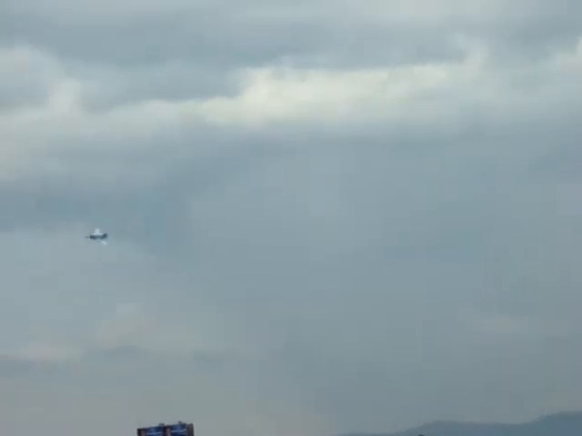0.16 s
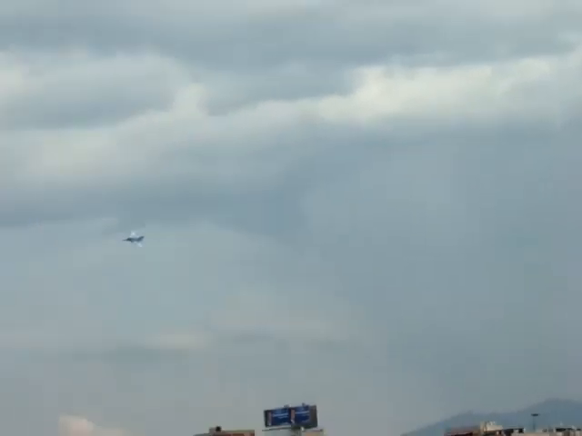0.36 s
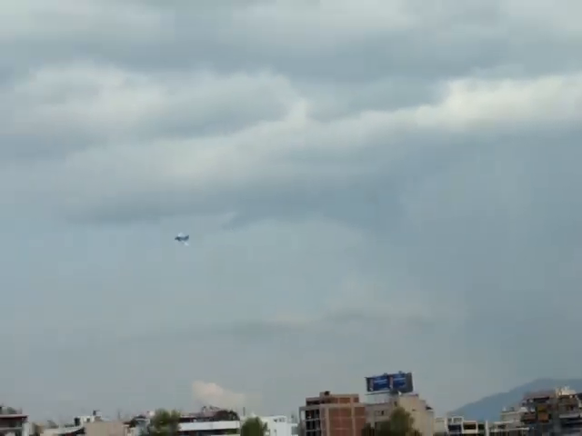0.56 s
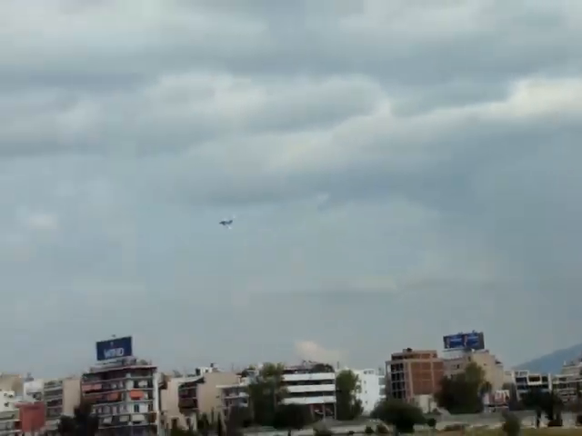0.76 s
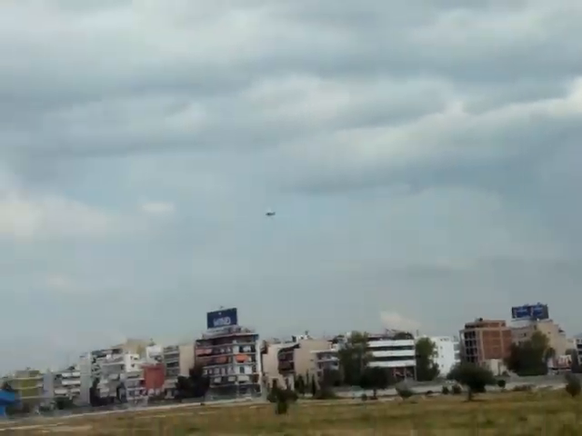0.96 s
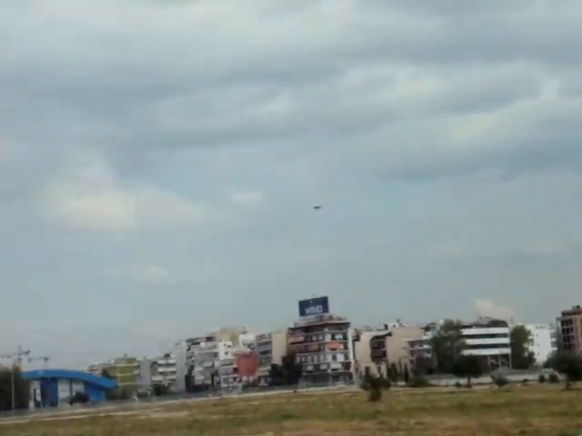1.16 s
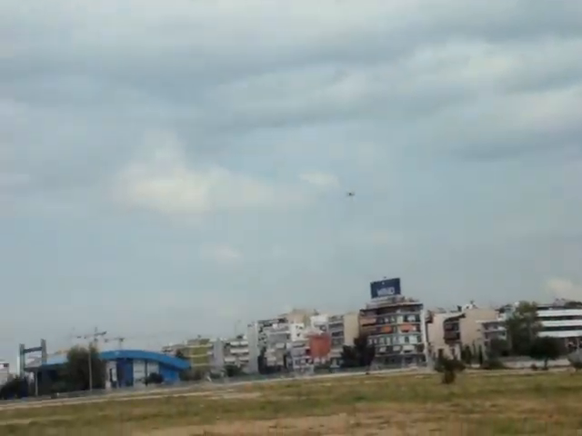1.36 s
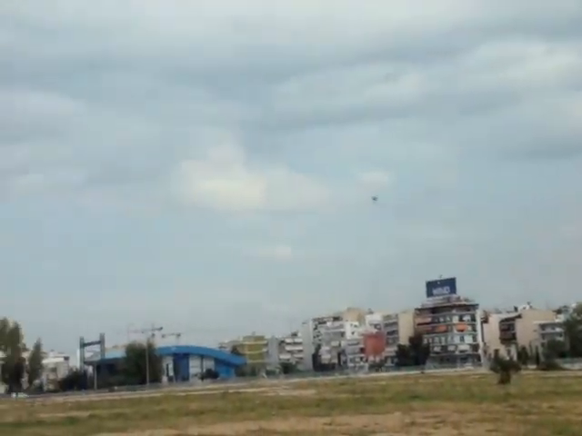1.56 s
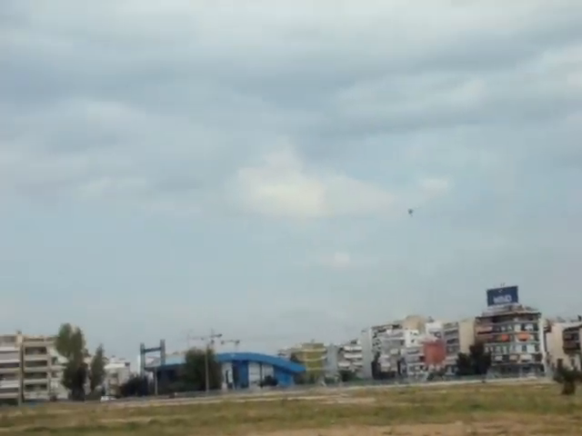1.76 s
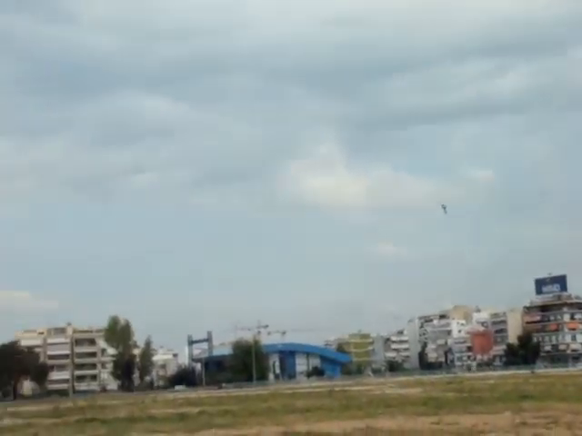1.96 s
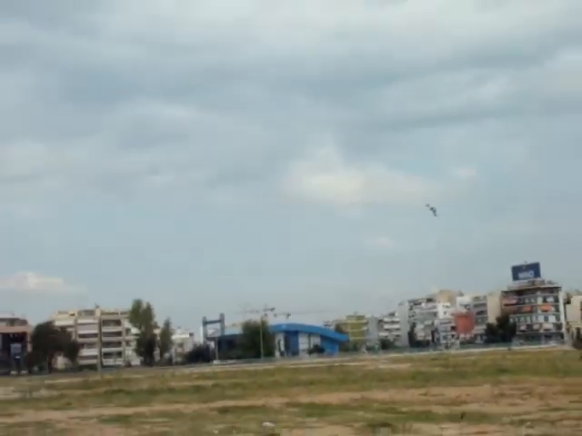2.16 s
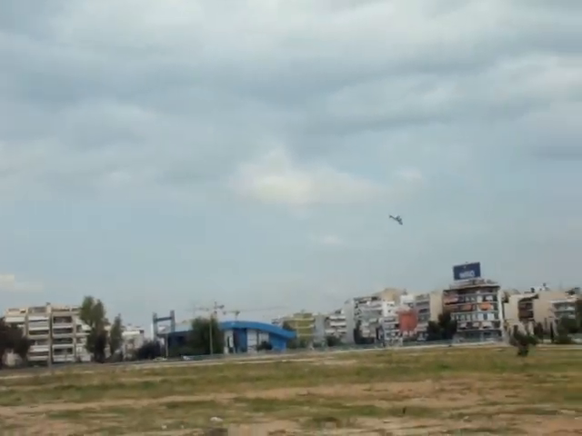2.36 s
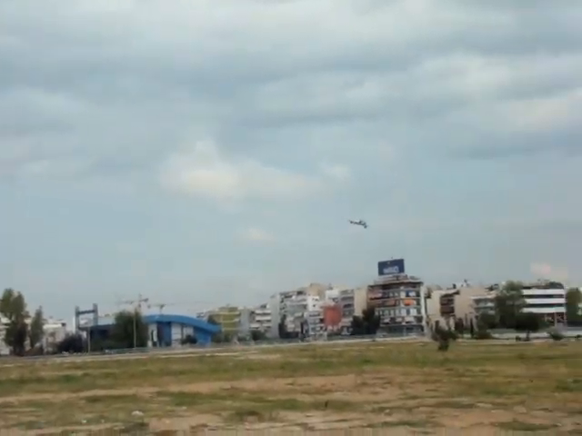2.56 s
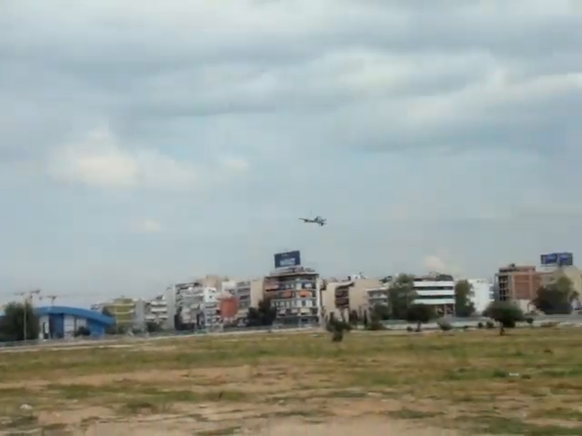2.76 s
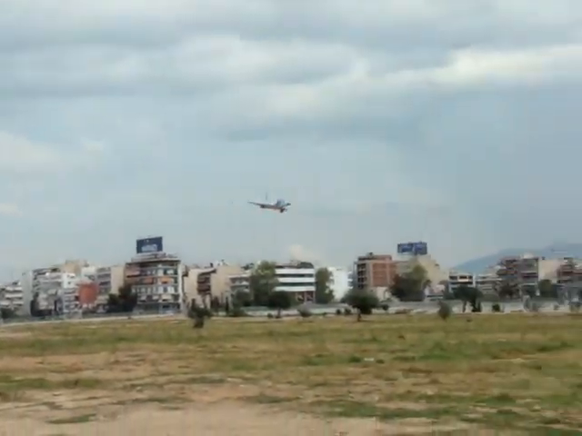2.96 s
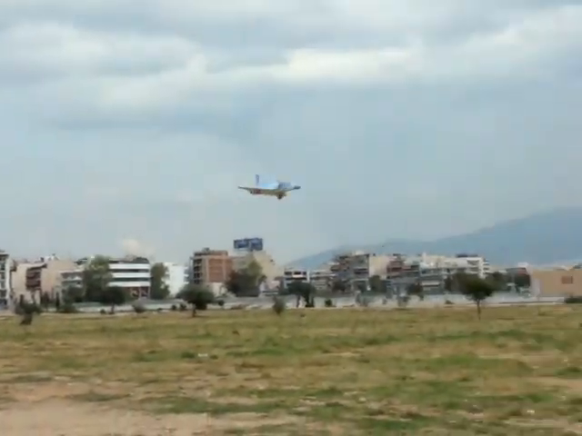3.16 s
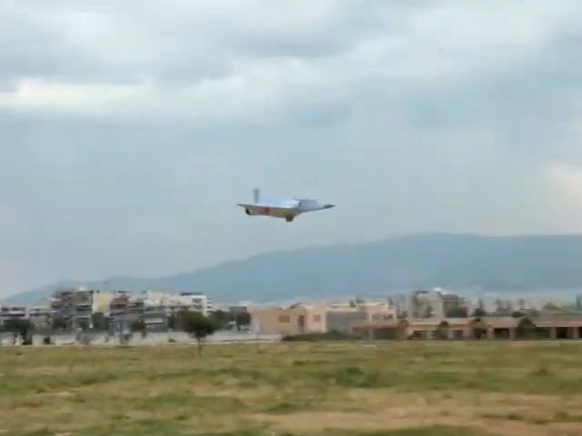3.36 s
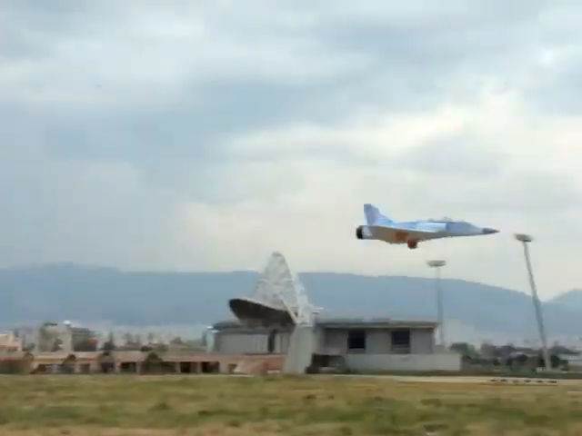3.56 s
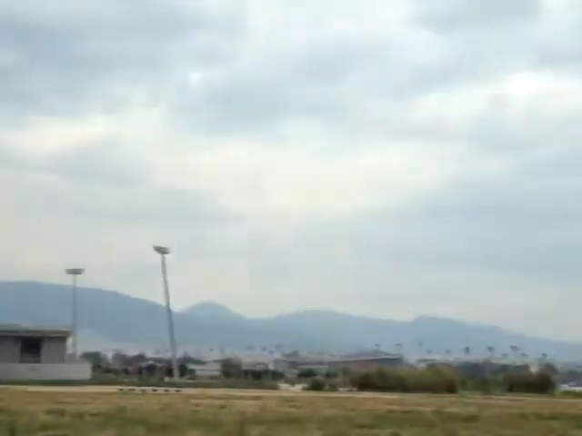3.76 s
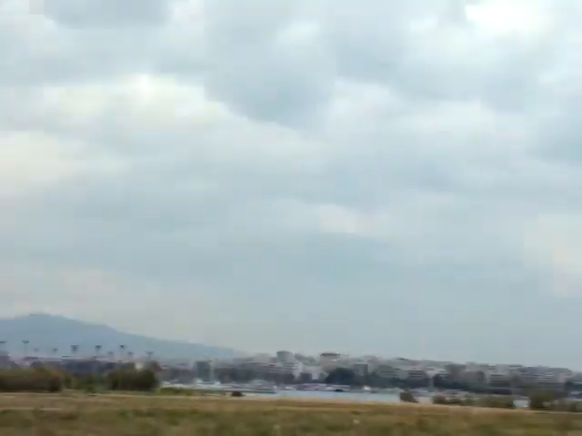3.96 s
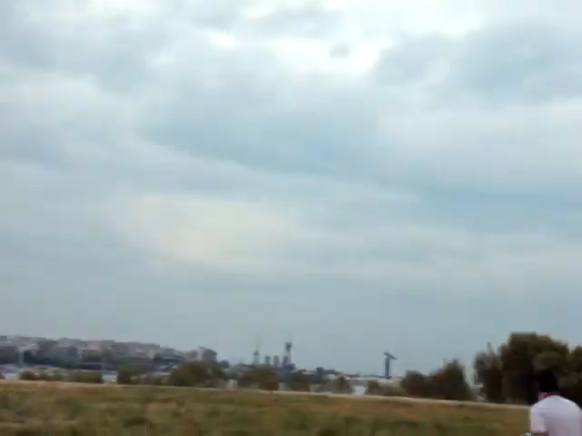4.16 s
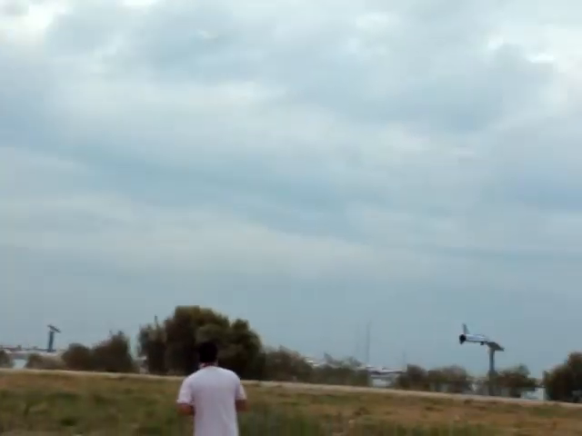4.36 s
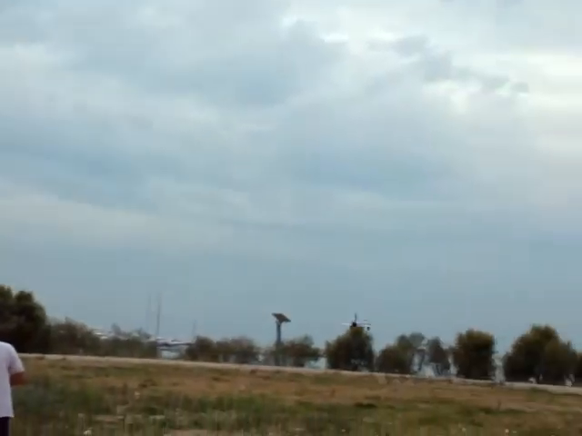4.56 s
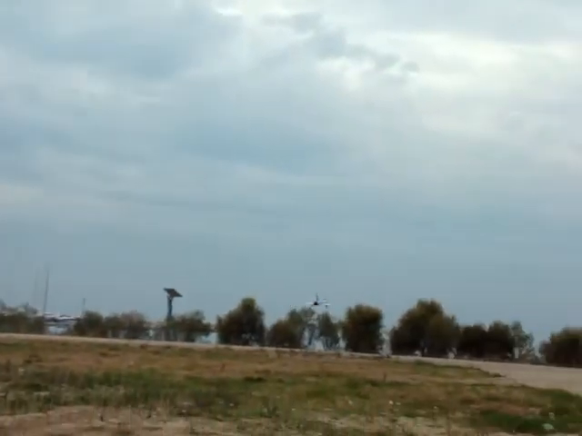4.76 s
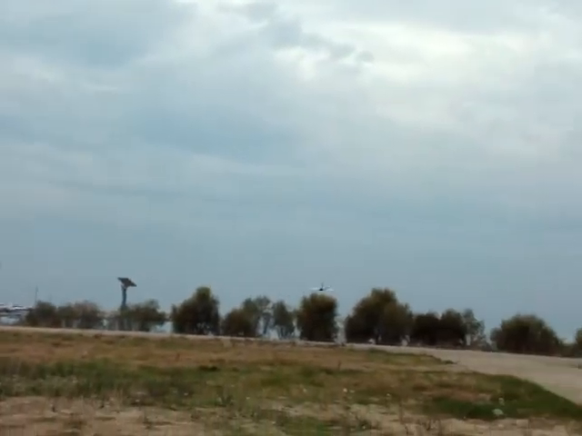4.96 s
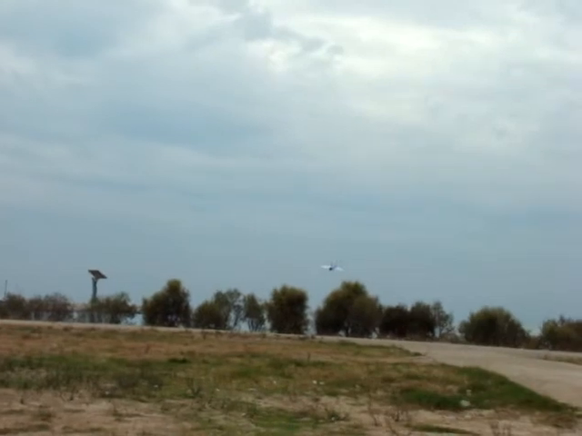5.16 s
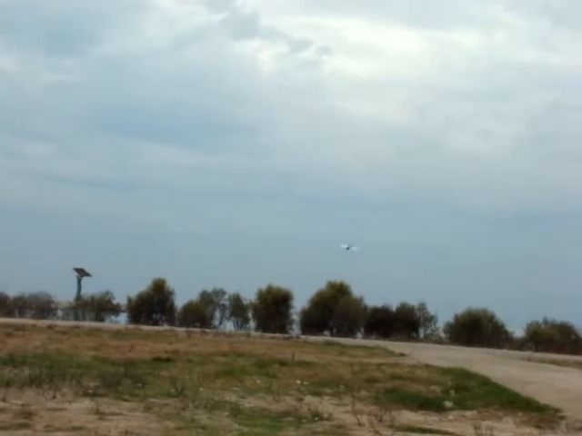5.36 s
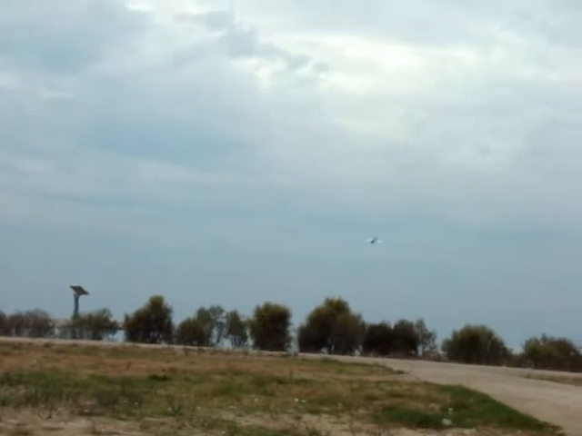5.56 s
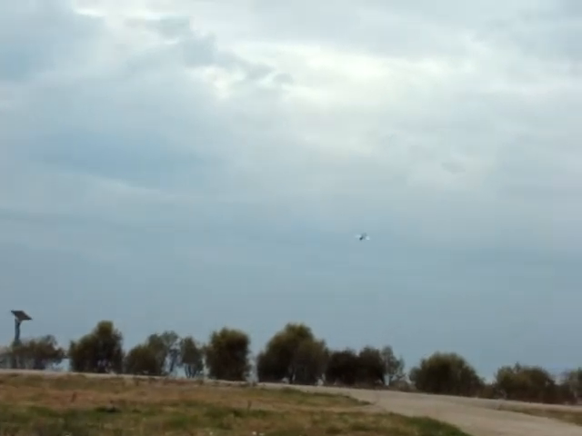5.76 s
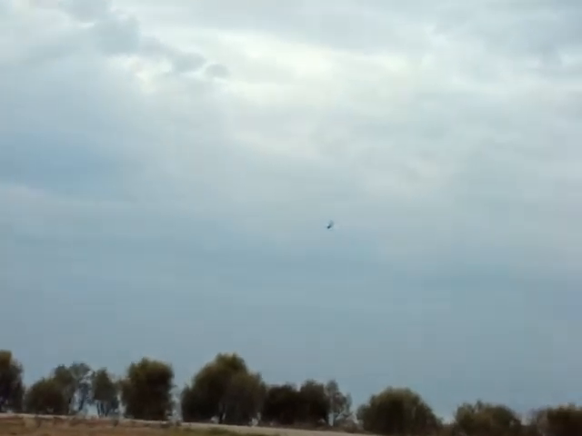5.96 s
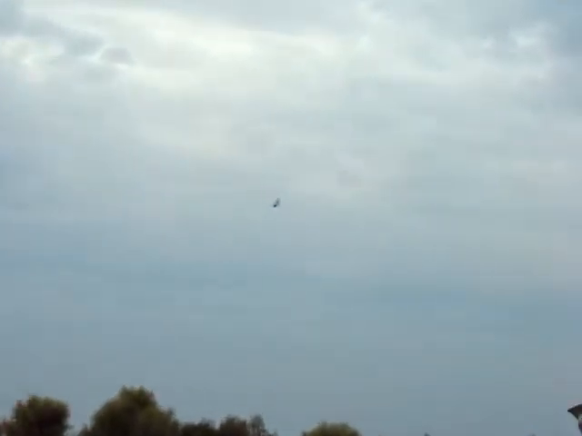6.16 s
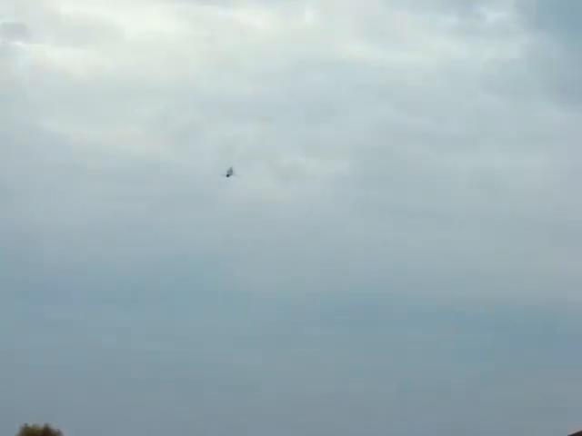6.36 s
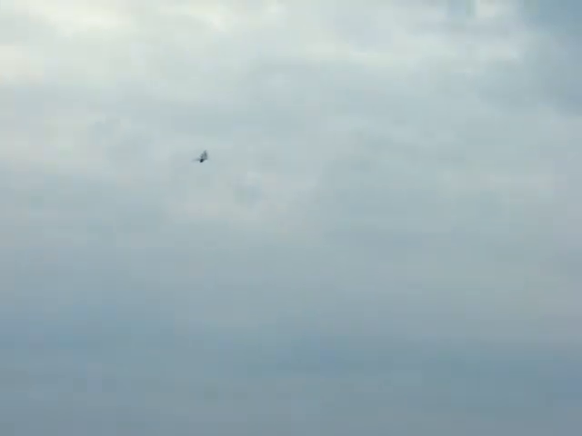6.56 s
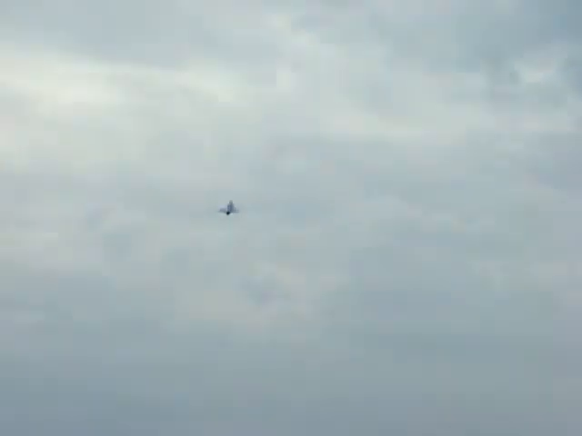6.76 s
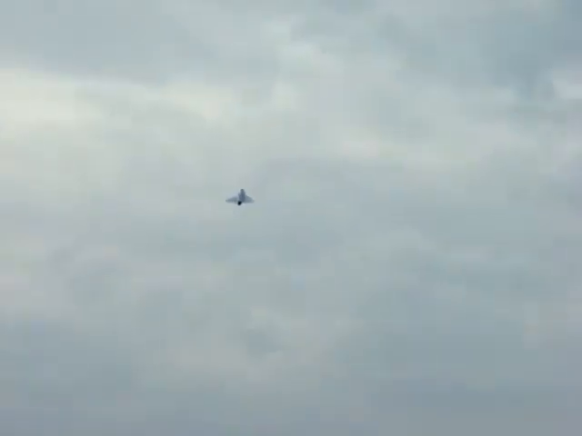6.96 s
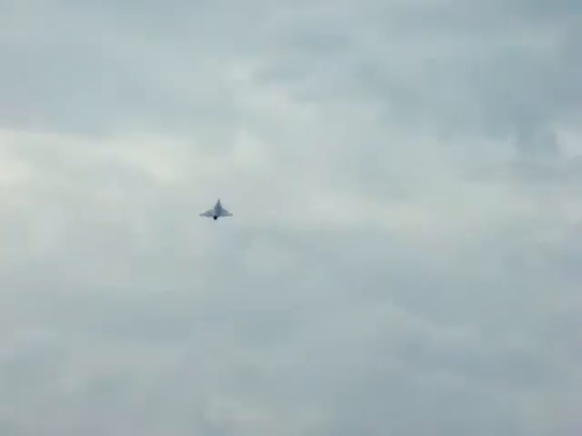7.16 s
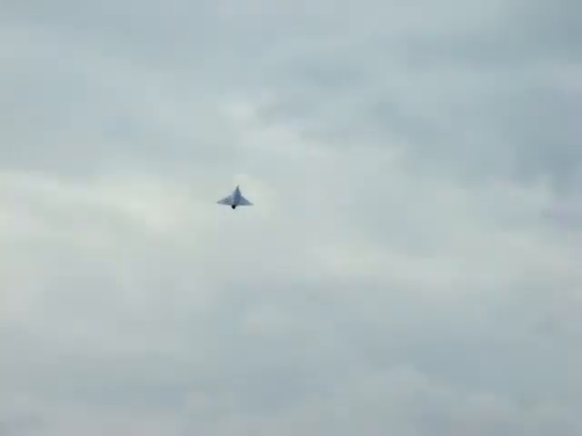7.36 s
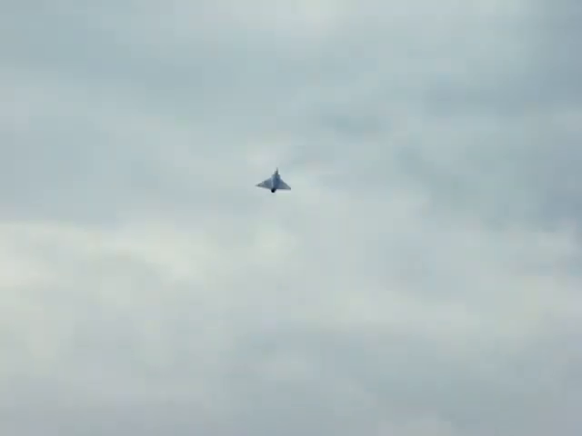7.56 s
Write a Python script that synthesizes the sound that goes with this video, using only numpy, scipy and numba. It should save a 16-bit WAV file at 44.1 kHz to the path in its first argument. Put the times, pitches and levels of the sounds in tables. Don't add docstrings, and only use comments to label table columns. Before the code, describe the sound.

Over a faint town hum, a small electric jet's singing whine and airy roar swell, slide downward in a close pass, and recede.

```python
import sys
import numpy as np
from scipy import signal
from scipy.fft import rfft, irfft, next_fast_len
from scipy.io import wavfile
from scipy.ndimage import uniform_filter1d, map_coordinates
from numba import njit

SR = 44100
rng = np.random.default_rng(int(sys.argv[2]) if len(sys.argv) > 2 else 0)


def persist_wave(psi):
    counts = np.round(np.clip(psi, -1, 1) * 32767).astype(np.int16)
    wavfile.write(sys.argv[1], SR, np.atleast_2d(counts).T)


def undo_db(level):
    steps = np.asarray(level, float) / 20
    return 10 ** steps


N = 335601
TIME = np.arange(N) / SR
NEAR_DB = -40
TOP_HZ = 10120

# pitch_hz, level_db (per Hz)
TOWN_COLOUR = [(15, -56), (25, -21.5), (121, -4.5), (271, -2), (322, -5), (494, -3), (603, -5), (857, -3),
               (1350, -8), (2930, -10), (5760, -21), (6700, -27.5), (10000, -46), (13000, -50.5),
               (22000, -120)]
# start_s, end_s, pitch_hz, level_db, second_partial_db
LORRY = (0, .32, 155, -50, -46)
# start_s, length_s, pitch_hz, relative_width (ratio), level_db
SWELLS = [
    (2.8, 0.53, 91, 0.96, -43.5),
    (3.493, 0.55, 360, 0.19, -44),
    (3.62, .42, 880, .2, -40.5),
    (0.45, 0.84, 400, 0.071, -51),
    (5.6, 1.96, 405, .08, -51),
    (1.25, 1.05, 4490, 0.11, -43),
    (1.4, 1.5, 6900, .15, -45),
]
# time_s, low_hz, high_hz, level_db
SIDE_HISS = [(.36, 6800, 8200, -62), (1.58, 6860, 8300, -44), (1.58, 4200, 5240, -37),
             (2.53, 7600, 9000, -42), (4.04, 6900, 8313, -35), (6.2, 7600, 9060, -40),
             (7.29, 6890, 8300, -49), (7.29, 5200, 6300, -46)]
# time_s, knock_db, snap_db
TICKS = [
    (.026, -16.5, -23),
    (.1935, -34, -25.5),
    (7.4527, -18, -34),
]
# pitch_hz, level_db, fade_by_60_db_s
CASE_RINGS = [(1025, 1, 0.031), (1580, 0.5, 0.024), (445, -7.5, 0.073), (3570, -5, 0.02)]
# start_s, length_s, level_db, bass_dip_db
SCUFFS = [(6.861, .02, -23, -8.5), (6.896, 0.089, -35, 0), (7.024, 0.045, -32, -0.5),
          (7.114, 0.03, -28.5, 2), (7.162, 0.046, -30, -0.5), (7.219, 0.027, -31, 0.5),
          (7.324, 0.021, -24.5, 0.5)]
# pitch_hz, level_db (per Hz)
CLOTH_COLOUR = [(2800, -19), (3600, -11), (5200, -8.5), (7500, -5), (9500, 3.5), (11000, -7)]
# start_s, length_s, low_hz, high_hz
TREBLE_LOSSES = [(0.027, 0.02, 5440, 8800), (0.198, 0.041, 4970, 7800), (6.995, .015, 9702, 11000),
                 (7.12, .012, 8900, 11000), (7.272, .014, 9700, 11000), (7.337, 0.023, 9100, 11000),
                 (7.337, 0.011, 6700, 7900)]

# pitch_hz, level_db (per Hz)
ROAR_COLOUR = [(450, -13), (700, 2), (1200, 0.5), (1800, -0.5), (3400, -14)]
# time_s, nearness_db, bank_db (plus is nozzle towards the camera)
FLIGHT = [(0, -63, -8), (.4, -57, 0.5), (.8, -50, -1), (1.2, -46.5, -2), (1.4, -43, -1), (1.9, -41.5, -5),
          (2.35, -42, 2), (3.0, -33, -1), (3.2, -37, .5), (3.4, -31, 2), (3.62, -39, 0), (4.0, -33.5, 0.5),
          (4.6, -33, 0.2), (5.6, -40, 1), (6.0, -41, 1.5), (6.4, -45.5, 1.1), (7.0, -43.5, -1),
          (7.61, -48.5, 2.5)]
# time_s, shaft_hz
SHAFT = [(0.0, 526.6), (0.6, 537.5), (1.09, 546.4), (1.52, 551.3), (2.17, 554.3), (2.75, 557.5),
         (3.05, 556.7), (3.33, 550.6), (3.52, 543.3), (3.72, 523.9), (3.94, 497), (4.09, 486.6),
         (4.24, 480), (4.6, 473.6), (5.0, 471.4), (6.17, 471.5), (6.89, 475.9), (7.6, 476.5)]
# time_s, delay_ms, share (0-1)
GROUND = [(0, 1.85, .3), (.5, 1.55, .35), (1.1, 1.36, .4), (2.8, 1.33, .3), (3.4, 2.2, .05),
          (4.1, 2.1, .15), (4.5, 1.1, .35), (4.8, .72, .4), (5.3, .68, .35), (5.7, .95, .2),
          (7.61, 2.65, .3)]
# shaft_multiple, width_multiples, level_db, extra_astern_db
DUCT = [
    [(5.12, .55, -3.5, 2), (5.3, 2.2, -4, 2)],
    [(6.8, 1.3, -3.5, -1.5), (8.1, 1.2, -1.5, 1), (9.6, 1.6, -5, 5)],
    [(11.3, 1.5, -3.5, -5), (13, 2.3, 2, 0.5), (15.2, 2.1, -5, 3.5)],
    [(16.72, 2.1, -4, 1.5), (17.72, 1.9, -0.5, 2), (19.68, 2.4, -2.5, 1)],
]
# level_db, nearness_slope (dB/dB), bank_slope (dB/dB), astern_db
PARTS = [
    (8, 0.86, -0.092, -7),
    (-0.05, 0.96, -0.85, -.3),
    (0.2, 0.86, -0.037, 0.1),
    (-0.84, 0.99, .9, 0.7),
]
# time_s, half_width_s, level_db
WAKE_BEAMS = [(.5, 0.46, -44.5), (2.1, 0.39, -38.5), (3.2, 0.22, -25.5), (3.8, 0.21, -31), (5.0, .15, -43)]
# time_s, half_width_s, change_db
SHADES = [
    [(1.9, 0.33, -1.5), (2.38, 0.28, -2), (2.93, .18, 3.5), (3.9, .2, 0.5), (6.5, 0.33, -3), (7.0, .15, -1)],
    [(1.3, .2, 0), (2.35, 0.16, 0.5), (.65, 0.44, -3.5), (3.25, 0.16, 3.5), (4.3, 0.42, -2),
     (5.2, .2, -1.5), (6.0, 0.95, 1.5)],
    [(1.5, .15, -4.5), (2.3, 0.41, 3.5), (3.0, .2, -1), (4.2, 0.18, 0.5), (6.4, .15, -2), (7.5, .2, -4)],
]

# time_s, half_width_s, level_db
SHAFT_BEAMS = [(.45, 0.61, -29.5), (1.5, .9, -30), (2.05, 0.21, -48), (2.8, 0.44, -30), (3.1, 0.35, -25),
               (3.33, 0.12, -16.5), (3.55, 0.45, -17.5), (3.6, 0.035, -19), (4.0, .2, -26),
               (4.15, 0.23, -34.5), (4.38, .05, -42), (4.67, .14, -48), (6.8, 2.6, -44.5)]
TWICE_BEAMS = [(1.27, 0.52, -43.5), (1.73, 1.4, -47.5), (3.3, 0.65, -32.5), (3.36, 0.24, -24.0),
               (3.46, 0.11, -25.0), (3.73, 0.063, -35), (4.52, 0.79, -38), (4.58, 0.17, -35.0),
               (5.57, 0.58, -47.0), (7.17, 1.36, -49.5)]
BLADE_BEAMS = [(0.03, 0.06, -38.5), (0.38, 0.27, -30.5), (1.08, 0.19, -21.5), (1.15, 0.51, -26.5),
               (1.3, 0.16, -25), (1.39, 1.34, -33), (1.82, 0.32, -26.5), (1.83, 0.04, -28.0),
               (2.32, 0.12, -28.5), (2.63, 0.3, -21), (3.02, 0.07, -38.5), (3.14, 0.14, -18.5),
               (3.3, 0.06, -23.0), (3.44, 0.09, -19), (3.55, 0.032, -15), (3.66, 0.08, -16),
               (3.79, 0.44, -22.5), (3.8, 0.027, -18), (4.17, 0.04, -30.5), (4.41, 0.17, -24),
               (4.72, 0.15, -24.5), (4.96, 1.11, -28.0), (5.94, 0.15, -32.5), (6.39, 0.05, -36.0),
               (6.56, 2.22, -37), (7.17, 0.34, -41)]
WEAK_BEAMS = {3: [(.93, 0.86, -49), (2.49, 0.43, -45), (3.24, .13, -37.5), (3.49, 0.047, -32),
              (3.5, 0.63, -43), (3.76, 0.071, -31.5), (4.05, 0.092, -41), (4.82, 0.63, -45.5)],
              4: [(.88, 1.5, -49), (1.7, .5, -46), (2.69, 0.13, -38.5), (3.2, 0.92, -41),
              (3.82, 0.084, -38), (3.5, 0.048, -30), (3.68, 0.066, -30), (3.97, .05, -38),
              (5.62, 1.52, -48.5), (7.0, 0.41, -43.5), (7.7, 0.25, -43)], 6: [(.4, .3, -53),
              (3.48, .09, -32.5), (3.63, 0.063, -38.5), (3.8, .1, -40), (3.6, 0.72, -46.5),
              (6.5, 2.7, -54)], 7: [(1.9, .6, -49), (2.87, 0.66, -43.5), (3.06, .08, -39),
              (3.6, 0.065, -38), (4.1, .8, -52)]}
WHINE_BEAMS = {10: [(.4, .15, -56), (.78, 0.4, -50), (1.2, 0.41, -52.5), (1.6, .3, -53), (2.0, .1, -45),
               (3.15, 0.1, -36.5), (3.0, .25, -49), (3.47, .06, -43), (3.33, 0.078, -33.5),
               (3.85, .04, -40), (3.97, 0.037, -32.5), (4.13, 0.039, -32), (4.22, .25, -43),
               (4.7, 0.49, -46), (5.52, .1, -45), (5.9, 2.8, -50.5)], 15: [(.87, 0.13, -57),
               (1.52, 0.25, -47), (2.44, .1, -41), (3.28, 0.14, -34.5), (4.12, .06, -36.5), (4.3, .07, -35),
               (4.5, .3, -38.5), (4.6, 1.8, -50), (7.0, 0.8, -54)], 20: [(3.97, .05, -37), (4.3, 0.11, -37),
               (4.17, .37, -46), (4.73, .15, -52), (5.35, .45, -46), (5.9, .35, -46), (7.11, .74, -56)]}


def unit(x):
    return x / np.sqrt(np.mean(x ** 2))


def columns(table):
    s, *rest = np.transpose(table)
    return [np.interp(TIME, s, column) for column in rest]


def gate(start, length, edge):
    return np.clip(np.minimum(TIME - start, start + length - TIME) / edge, 0, 1)


def lobe(s, half):
    return np.clip(1 - ((TIME - s) / half) ** 2, 0, 1)


def beams(rows):
    power = sum((undo_db(db) * lobe(s, half)) ** 2 for s, half, db in rows)
    return 10 * np.log10(power + 1e-9)


def walk(rate):
    k = int(SR / rate)
    steps = np.repeat(rng.standard_normal(N // k + 1), k)
    smooth = uniform_filter1d(uniform_filter1d(steps, k), k)
    return unit(smooth[:N])


@njit
def moving_filter(x, hz, width):
    y, b, l = np.empty(len(x)), 0., 0.
    for i in range(len(x)):
        g = np.tan(np.pi * hz[i] / SR)
        v = (b + g * (x[i] - l)) / (1 + g * (g + width))
        b, l, y[i] = 2 * v - b, l + 2 * g * v, width * v
    return y


def hump(hz, width):
    once = moving_filter(rng.standard_normal(N), hz, width)
    return unit(moving_filter(once, hz, width))


def colour(points):
    hz, db = np.transpose(points)
    size = next_fast_len(N)
    noise_hz = np.arange(size // 2 + 1) * SR / size
    gain = undo_db(np.interp(np.log(noise_hz + 1), np.log(hz), db))
    return unit(irfft(rfft(rng.standard_normal(size)) * gain, size)[:N])


def band(x, low_hz, high_hz):
    size = next_fast_len(N)
    hz = np.arange(size // 2 + 1) * SR / size
    edge = np.clip(np.minimum(hz - low_hz, high_hz - hz) / 80 + .5, 0, 1)
    return irfft(rfft(x, size) * edge, size)[..., :N]


def astern(shaft_hz):
    return (shaft_hz.max() - shaft_hz) / np.ptp(shaft_hz)


def town():
    ducking = np.interp(TIME, (3.15, 3.9, 4.2, 4.8), (0, 1, 1, 0))
    return undo_db(-38 - 9.5 * ducking + 1.4 * walk(4.03)) * colour(TOWN_COLOUR)


def lorry():
    start, end, hz, db, second_db = LORRY
    first = undo_db(db) * np.sin(2 * np.pi * hz * TIME)
    second = undo_db(second_db) * np.sin(4 * np.pi * hz * TIME)
    return (first + second) * gate(start - .1, end - start + .1, .08)


def swells():
    return sum(undo_db(db) * gate(s, length, 0.17) * hump(np.full(N, 1. * hz), width)
               for s, length, hz, width, db in SWELLS)


def side_hiss():
    return sum(undo_db(db) * gate(s - .02, .04, 0.012) * unit(band(rng.standard_normal(N), low_hz, high_hz))
               for s, low_hz, high_hz, db in SIDE_HISS)


def camera():
    out, t = np.zeros(N + SR), np.arange(2048) / SR
    knock = sum(undo_db(db - 60 * t / t60) * np.sin(2 * np.pi * hz * t) for hz, db, t60 in CASE_RINGS) / 2
    bright = signal.butter(3, [3500, 8200], "band", fs=SR, output="sos")
    for s, knock_db, snap_db in TICKS:
        snap = signal.sosfilt(bright, rng.standard_normal(len(t))) * 2 * undo_db(-60 * t / 0.0072)
        start = int(s * SR)
        out[start:start + len(t)] += undo_db(snap_db) * snap - undo_db(knock_db) * knock
    return out[:N]


def strap():
    grain = colour(CLOTH_COLOUR) * undo_db(1.2 * walk(400))
    strokes = sum(undo_db(db) * gate(s, length, 0.0015) for s, length, db, _ in SCUFFS)
    return strokes * grain


def bass_dip():
    return undo_db(sum(db * gate(s + 0.0019, length + .006, 0.0023) for s, length, _, db in SCUFFS))


def roar():
    near_db, _ = columns(FLIGHT)
    steady = undo_db(-35.5 + 0.11 * (near_db - NEAR_DB))
    passing = undo_db(beams([(3.28, 0.59, -29)]))
    return np.hypot(steady, passing) * undo_db(-5.0 + 0.31 * walk(3.45)) * colour(ROAR_COLOUR)


def rush(shaft_hz):
    near_db, bank_db = columns(FLIGHT)
    behind = astern(shaft_hz)
    gains = [undo_db(NEAR_DB + db + slope * (near_db - NEAR_DB) + lean * bank_db + astern_db * behind)
             for db, slope, lean, astern_db in PARTS]
    gains[0] = np.hypot(gains[0], undo_db(beams(WAKE_BEAMS)))
    for i, rows in enumerate(SHADES, start=1):
        gains[i] = gains[i] * undo_db(sum(db * lobe(s, half) ** 2 for s, half, db in rows))
    out, gust = 0, walk(9)
    for part, gain in zip(DUCT, gains):
        for multiple, width, db, astern_db in part:
            heard_db = db + astern_db * behind + 0.8 * gust + 0.65 * walk(18)
            out = out + gain * undo_db(heard_db) * hump(multiple * shaft_hz, width / multiple)
    return out


def bounce(x):
    delay_ms, share = columns(GROUND)
    late = map_coordinates(x, [np.arange(N) - delay_ms * SR / 1000], order=3)
    return x + share * uniform_filter1d(late, size=3)


def tones(shaft_hz):
    turn = 2 * np.pi * np.cumsum(shaft_hz * (1 + 0.000286 * walk(25.14))) / SR
    tables = {1: SHAFT_BEAMS, 2: TWICE_BEAMS, 5: BLADE_BEAMS, **WEAK_BEAMS, **WHINE_BEAMS}
    levels = {multiple: beams(rows) for multiple, rows in tables.items()}
    out = 0
    for multiple, db in levels.items():
        shimmer_db = np.sqrt(multiple) * (0.23 * walk(15) + 0.27 * walk(50))
        if multiple > 5:
            shimmer_db = shimmer_db + 1.5 * walk(12)
        start_phase = 2 * np.pi * rng.random()
        out = out + np.sqrt(2) * undo_db(db + shimmer_db) * np.sin(multiple * turn + start_phase)
    out = out + undo_db(levels[1] - 20.0) * hump(shaft_hz, 0.4)
    out = out + undo_db(levels[2] - 13.0) * hump(2 * shaft_hz, 0.13)
    whine_db = levels[10] - 10.5 + 6 * astern(shaft_hz) + 3.5 * walk(30)
    return out + undo_db(whine_db) * hump(10 * shaft_hz, 0.02)


def scene():
    shaft_hz, = columns(SHAFT)
    outside = town() + lorry() + swells() + roar() + bounce(rush(shaft_hz)) + tones(shaft_hz)
    dipped = outside - (1 - bass_dip()) * band(outside, -100, 3100)
    mid = dipped + camera() + strap()
    side = side_hiss()
    return np.array([mid + side, mid - side])


def low_pass(x):
    return signal.sosfilt(signal.butter(12, 10710, fs=SR, output="sos"), x)


def record(dry):
    out = dry
    for s, length, low_hz, high_hz in TREBLE_LOSSES:
        out = out - gate(s, length, 0.0021) * band(out, low_hz, high_hz)
    for low_hz in np.arange(4860, TOP_HZ, 660):
        blink = np.clip(4 * (walk(190) - 1.5), 0, .95)
        out = out - blink * band(out, low_hz, low_hz + 660)
    return low_pass(band(out, 35, TOP_HZ))


dry = scene()
out = record(dry)
persist_wave(out)
```